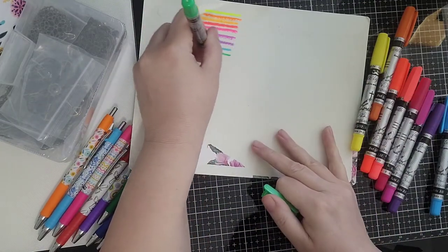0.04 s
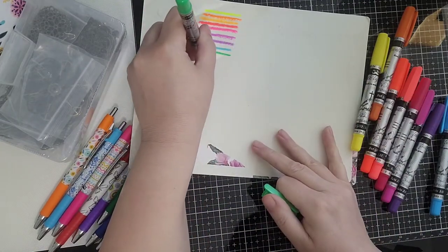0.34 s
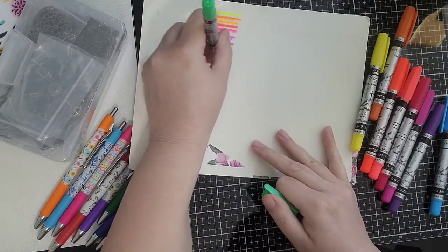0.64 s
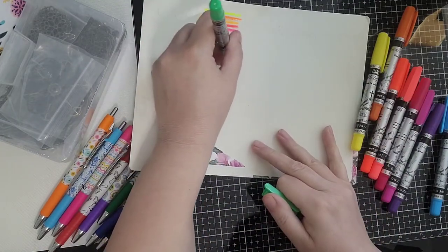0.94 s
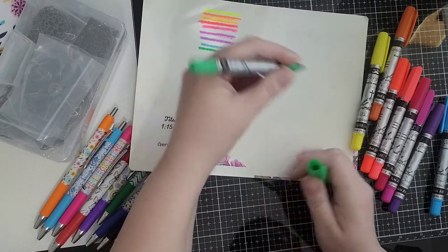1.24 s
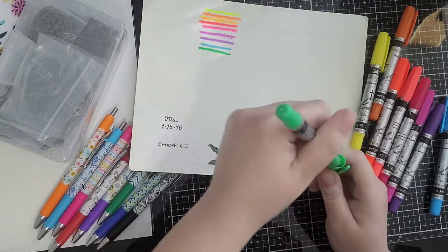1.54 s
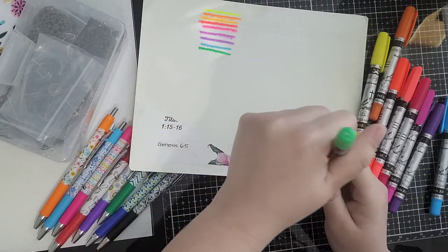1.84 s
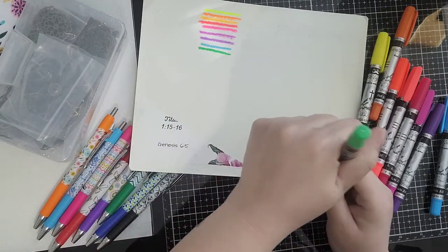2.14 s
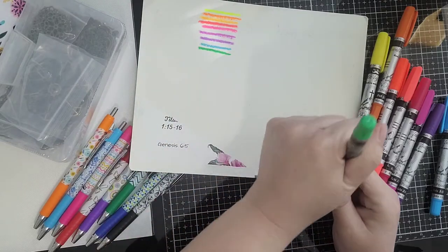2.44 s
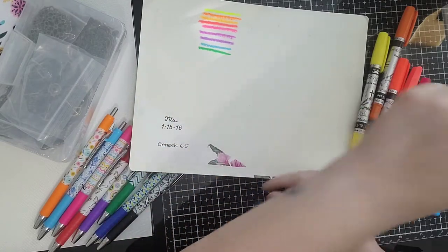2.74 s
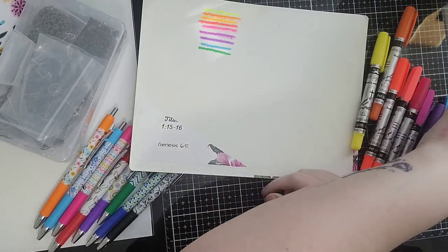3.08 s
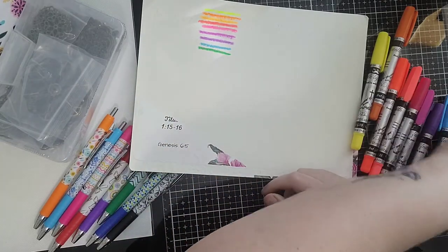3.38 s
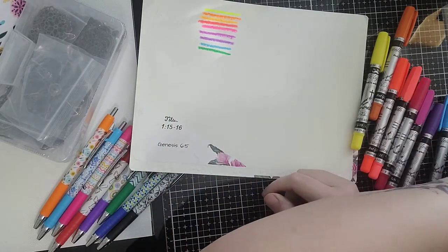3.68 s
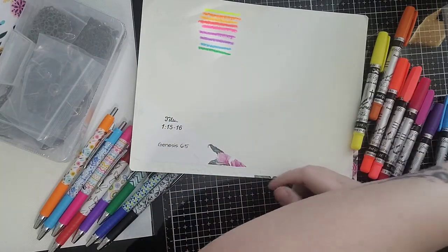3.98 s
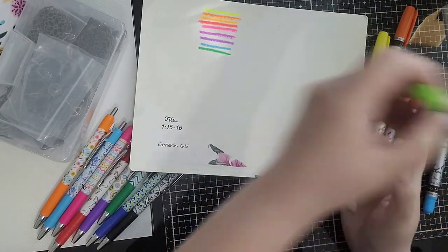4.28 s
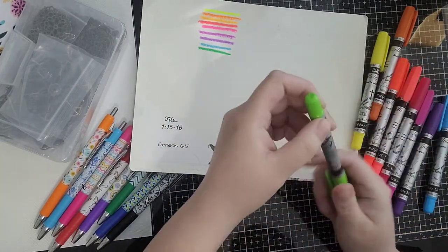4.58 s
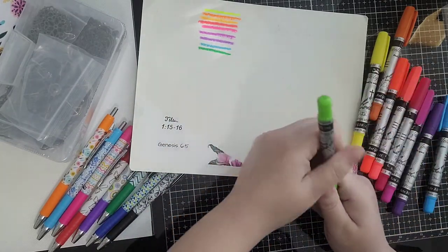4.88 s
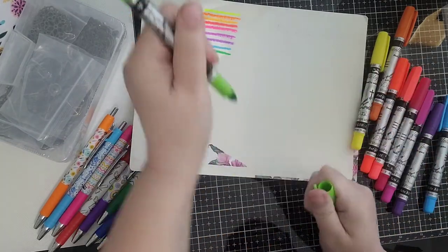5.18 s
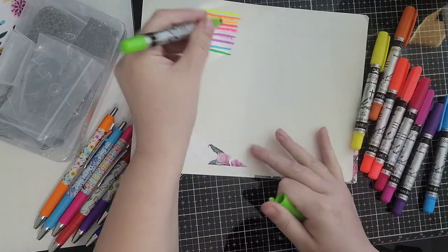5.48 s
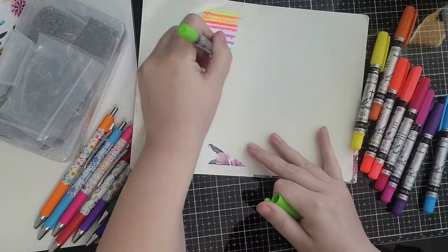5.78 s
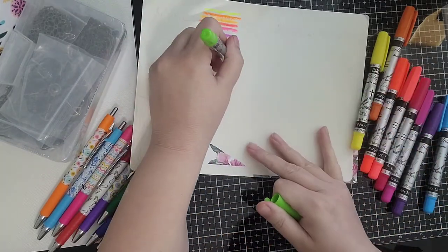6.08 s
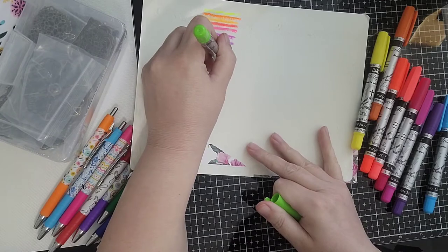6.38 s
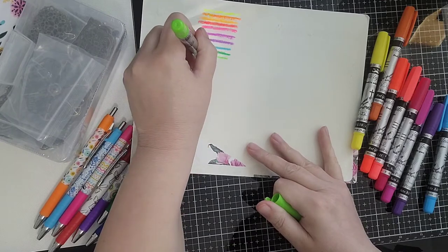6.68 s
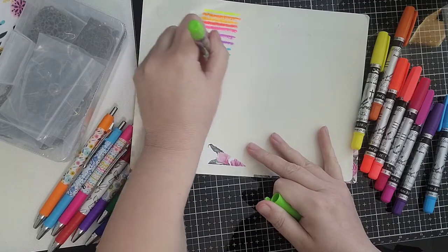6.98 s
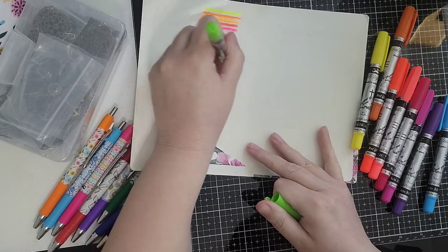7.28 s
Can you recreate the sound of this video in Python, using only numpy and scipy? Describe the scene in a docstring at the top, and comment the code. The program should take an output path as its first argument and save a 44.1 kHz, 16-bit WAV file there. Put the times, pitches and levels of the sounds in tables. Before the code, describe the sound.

A felt marker rubs faintly across paper in short grainy strokes, ending with a small flick of the tip at about 1.1 seconds. Light hollow plastic taps come just before 2 seconds, and the cap snaps shut with a sharp pop at 2.3. After a small knock, the marker lands among others on the desk at about 3.25 with a hard plastic clack, by far the loudest sound. Dull bumps and lighter clicks follow as it settles, thinning out by 4.6 seconds. At 5 seconds another cap pulls free with a pop and a click, followed by a few tiny ticks. Very soft felt strokes return from 5.5 seconds to the end at about 7.5, with small tip touches just after 7. Everything is close to a stereo microphone in a small room, over a faint, steady electrical and fan hum.

```python
"""A desk in a small room, a stereo microphone close to a sketchbook and some felt markers.
A felt tip catches on the paper in grainy strokes. The cap snaps over its catch with a pop of trapped
air, the plastic barrel clacks down among the others and sets the desk top drumming, and the next
marker is pulled open with a pop for more strokes. Mains and a fan hum faintly throughout."""
import sys
import numpy as np
from scipy import signal
from scipy.fft import rfft, irfft
from scipy.io import wavfile

SR = 44100
rng = np.random.default_rng(int(sys.argv[2]) if len(sys.argv) > 2 else 0)


def wrap_up_sound(samples):
    """Save the sound to the file named by the first command line argument, as 16-bit audio."""
    columns = np.atleast_2d(samples).T
    # keep every value between -1 and 1, then stretch to whole-number steps
    tamed = np.clip(columns, -1, 1)
    steps = np.round(tamed * 32767).astype(np.int16)
    wavfile.write(sys.argv[1], SR, steps)


N = 332008
TIME = np.arange(N) / SR
EDGES_HZ = np.geomspace(22, 17500, 30)
BANDS_HZ = np.sqrt(EDGES_HZ[1:] * EDGES_HZ[:-1])
BAND_FILTERS = [signal.butter(2, pair, "band", fs=SR, output="sos") for pair in zip(EDGES_HZ, EDGES_HZ[1:])]
DESK_TOP_HZ = 253

# hum lines: pitch_hz, left_db, right_db
HUM_LINES = [(50.4, -72.5, -66.5), (101.2, -63.5, -67), (121.2, -77, -72.5), (202.3, -84, -87)]
# slow swell of the room tone, taken about its mean: time_s, level_db
ROOM_TONE_SWELL = np.vstack([ [(0.0, -63), (0.74, -64.5), (1.04, -63), (2.54, -62.5), (2.83, -64.5),
                   (3.08, -64.5)], [(3.85, -67), (4.15, -67), (5.28, -62), (5.97, -65), (7.33, -63),
                   (7.53, -62)], ])
# rumble of the room's air: frequency_hz, density_db
AIR_COLOUR = [(25, -10), (55, -0.5), (80, -3), (110, 1.5), (180, 1.5), (280, 2), (380, -10), (600, -18),
              (1100, -23), (3000, -28.5), (8000, -30.5), (16000, -30)]
# felt tip crossing the paper: fastest_s, speed_up_s, slow_down_s, level_db, barrel_resonance_db
TIP_STROKES = [(0.03, .15, 0.18, -73.5, -2), (0.66, 0.24, 0.33, -74.5, 9), (1.091, 0.082, .03, -70.5, 0),
               (5.51, 0.093, 0.11, -73.5, -2), (5.72, 0.14, 0.16, -77, 8), (5.885, 0.079, .06, -78, 5.5),
               (6.40, 0.11, 0.24, -82, 9.5), (6.66, 0.17, 0.21, -85.5, 3), (7.11, 0.21, 0.15, -73.5, -1.5),
               (7.349, 0.077, 0.049, -80, 2), (7.52, .1, .1, -73, -4)]
# felt on paper, skin on plastic: frequency_hz, density_db
RUB_COLOUR = [(200, -23.5), (700, -14.5), (1200, -9.5), (1950, -3.5), (2900, -7.5), (4300, 0.5), (6000, 0),
              (7400, -2), (9000, -7.5), (16000, -11)]
# soft bumps of the hand and a settling marker: start_s, level_db, pitch_hz, decay_s
SOFT_BUMPS = [(0.147, -66, 410, 0.32), (0.848, -75.5, 550, 0.017), (2.505, -71, 390, .03),
              (3.314, -39, 580, 0.035), (3.3307, -35, 910, 0.03), (3.349, -38.5, 664, 0.024),
              (3.603, -53, 610, 0.089), (3.62, -58, 850, .03)]
# light touches of the tip on paper, or on a cap or barrel, ringing the hollow: start_s, level_db, ring_s
LIGHT_TOUCHES = [(0.852, -68, 0.035), (0.972, -61, 0.044), (1.089, -59, 0.05), (1.8147, -53, 0.055),
                 (1.9861, -46, 0.052), (3.7312, -48, 0.071), (3.9001, -67, 0.077), (4.1042, -60.5, 0.032),
                 (4.66, -66, .03), (4.9218, -58.5, 0.035), (5.6623, -64, 0.07), (7.3163, -57.5, 0.038)]
# air in a cap or barrel: pitch_hz, level_db, share_of_ring_time
HOLLOW_MODES = [(780, -16, 0.15), (1410, -2, 0.22), (1832, -3, .7), (2030, -5.5, .7), (2480, -11, .4)]
# the tip flicking off the paper: start_s, level_db
TIP_FLICKS = [(1.047, -72), (1.095, -61), (1.1063, -46.5), (1.234, -72.5), (7.129, -56)]
# one flick: frequency_hz, density_db
FLICK_COLOUR = [(200, -26), (700, -14), (1500, -4), (2400, -3), (3000, -5), (4000, 2), (7200, 0),
                (9000, -12), (16000, -17)]
# the cap's rim jumping its catch: start_s, level_db, tilt_db_per_octave, left_minus_right_db
RIM_SNAPS = [(1.989, -61, 6.5, -4), (2.3095, -24, 0, -0.5), (2.321, -48, -2, -4), (5.037, -44, 1, -1),
             (5.0469, -41.5, 4.5, 1.5), (5.0560, -48, -3, -4)]
# one snap: frequency_hz, density_db
SNAP_COLOUR = [(150, -20), (400, -6.5), (1000, -10.5), (1550, -9.5), (2000, -4.5), (2800, -1), (3800, -2.5),
               (4900, 1), (6200, -0.5), (7600, -3), (9500, -12), (12300, -4.5), (16000, -17.5)]
# plastic knocks and small ticks of the markers and their tips:
# start_s, level_db, relative_thud_db, relative_tick_db
MARKER_KNOCKS = [(2.1119, -51, -12, -8), (3.1215, -55, -7, -22), (3.153, -28, -25, -30),
                 (3.2202, -50, -17, -36), (3.2525, -1, -32.5, -25), (3.5108, -40, -12.5, -24),
                 (3.5334, -38, -13, -29), (3.5842, -46, -11, -12.5), (3.681, -46, -14, -17.5),
                 (3.7314, -41, -20.5, -32), (3.9612, -43.5, -24, -7.5), (4.017, -53.5, -14, -15.5),
                 (4.4602, -60, -19.5, -12), (4.564, -65, -15, -10.5), (5.3757, -61.5, -19.5, 2),
                 (5.395, -53.5, -30, -15.5), (5.524, -61.5, -11.5, -21)]
# a knock's plastic clack: frequency_hz, density_db
CLACK_COLOUR = [(200, -26), (700, -15.5), (1100, -14), (1560, -1), (2000, -4.5), (2470, -2.5), (3110, -2.5),
                (3900, 1.5), (4900, -3.5), (6200, -8), (7800, -15), (9800, -32.5), (16000, -36.5)]
# its dull thud through the desk: frequency_hz, density_db
THUD_COLOUR = [(30, -44.5), (100, -25), (170, -13.5), (260, 3), (450, 1), (720, 1.5), (1200, -5.5),
               (2000, -26.5), (16000, -59)]
# its bright tick: frequency_hz, density_db
TICK_COLOUR = [(1500, -30), (4000, -4.5), (7000, 6), (9000, -2.5), (12000, -1), (16000, -4)]
# ring of a barrel: pitch_hz, level_db
BARREL_MODES = [(1478, -14), (1688, -13), (2040, -13), (2375, -6.5), (2500, -13.5), (2527, -10.5),
                (3022, -15.5), (3712, -4), (4320, -10), (4471, -10), (5177, -16), (5698, -18)]
# fingers and cap sliding on a barrel: fastest_s, speed_up_s, slow_down_s, level_db
BARREL_SLIDES = [(2.301, .065, .015, -65), (2.68, 0.24, .35, -85.5), (4.27, 0.37, 0.53, -86.5),
                 (4.85, .35, 0.32, -86)]
# the cap seating or coming free: start_s, pop_db, pitch_hz, t60_s, thump_db, hollow_db
CAP_POPS = [(2.3088, -24, 510, 0.0052, -60.5, -38.5), (2.312, -35.5, 270.4, 0.046, -44.5, -53.5),
            (5.0366, -22.5, 505, 0.0047, -51, -43), (5.045, -36, 266, 0.044, -39.5, -37.5)]
# likeness of left and right in spread-out sound: frequency_hz, correlation
STEREO_LIKENESS = [(100, .92), (280, .85), (600, 0.29), (1200, -0.26), (2200, -0.062), (4500, -0.19),
                   (16000, 0.72)]
# early echoes off desk, box and wall: delay_s, level_db
EARLY_ECHOES = [(.0035, -14.5), (0.0105, -13.5), (0.0132, -18.5)]
# length of the room's tail: frequency_hz, t60_s
TAIL_DECAY = [(100, .35), (300, .35), (800, .28), (2000, .3), (5000, .32), (8000, .27), (15000, .27)]
# the tail against the direct sound: frequency_hz, level_db
TAIL_COLOUR = [(100, -6.5), (300, -8), (800, -4), (2000, -3), (5000, -5.5), (8000, -5), (15000, -5)]


def from_db(db):
    return 10 ** (np.asarray(db) / 20)


def per_band(points):
    """Read a table at each band's centre, on a log-frequency axis."""
    hz, value = np.transpose(points)
    return np.interp(np.log(BANDS_HZ), np.log(hz), value)


def unit_energy(x):
    return x / np.sqrt(np.sum(x ** 2, axis=-1, keepdims=True) + 1e-30)


def decay(t60, size):
    """Envelope that falls 60 dB in t60 seconds."""
    return np.exp(-np.log(1000) * TIME[:size] / max(t60, 1e-4))


def panned(x, pan_db):
    """Place a sound; pan_db is left minus right."""
    return x * from_db([[pan_db / 2], [-pan_db / 2]])


def add(out, start_s, sound):
    i = max(round(start_s * SR), 0)
    out[:, i:i + sound.shape[-1]] += sound[..., :N - i]


def drift(rate_hz):
    """A random wander through knots of spread 1."""
    knots = rng.standard_normal(int(rate_hz * N / SR) + 2)
    return np.interp(TIME * rate_hz, np.arange(len(knots)), knots)


def coloured(band_db, noise_pairs):
    """Each band filters a pair of noises and makes left and right partly alike; energy 1 a side."""
    gains = from_db(band_db) * np.sqrt(np.diff(EDGES_HZ))
    out = 0
    for sos, gain, pair, alike in zip(BAND_FILTERS, gains, noise_pairs, per_band(STEREO_LIKENESS)):
        left, other = unit_energy(signal.sosfilt(sos, pair))
        right = alike * left + np.sqrt(1 - alike ** 2) * other
        out = out + gain * np.array([left, right])
    return unit_energy(out)


def hiss(colour):
    """Steady stereo noise of rms 1."""
    white = rng.standard_normal((2, 2, N))
    return np.sqrt(N) * coloured(per_band(colour), [white[k % 2] for k in range(len(BANDS_HZ))])


def even_burst(t60, size=4096):
    """A click smeared by a body with many modes: it dies like noise, with all pitches about equal."""
    burst = rng.standard_normal((2, 2, size)) * decay(t60, size)
    for _ in range(4):
        flat_spectrum = np.exp(1j * np.angle(rfft(burst)))
        burst = irfft(flat_spectrum, size) * decay(10 * t60, size)
    return burst


def crack(colour, t60, tilt_db=0):
    """Many heavily damped modes struck at once, with the energy of 10 ms at rms 1."""
    band_db = per_band(colour) + tilt_db * np.log2(BANDS_HZ / 1000)
    bursts = even_burst(t60)
    return np.sqrt(SR / 100) * coloured(band_db, [bursts[k % 2] for k in range(len(BANDS_HZ))])


def ring(hz, t60, phase=0):
    """One damped mode."""
    return np.sin(2 * np.pi * hz * TIME[:SR // 2] + phase) * decay(t60, SR // 2)


def swelling_ring(hz, t60, rise_s):
    """A mode driven gradually instead of struck."""
    return ring(hz, t60) - ring(hz, rise_s)


def struck(modes, spread_db):
    """A blow gives each mode its own strength, and its own phase in each channel."""
    out = 0
    for hz, db, t60 in modes:
        gain = from_db(db + spread_db * rng.standard_normal())
        out = out + gain * ring(hz, t60, phase=rng.uniform(0, 2 * np.pi, (2, 1)))
    return out


def resonance(x, hz, q):
    return signal.lfilter(*signal.iirpeak(hz, q, fs=SR), x)


def hand_sweep(fastest_s, rise_s, fall_s, speed_power=2.1):
    """Rubbing grows as a power of the hand's speed, which rises smoothly and falls back to rest."""
    progress = np.interp(TIME, [fastest_s - rise_s, fastest_s, fastest_s + fall_s], [0, 1, 0])
    return np.sin(np.pi / 2 * progress) ** speed_power


def hum(hz, level_db, waver_db, waver_hz):
    """A tone whose level wavers."""
    gain = from_db(level_db + waver_db * drift(waver_hz))
    return gain * np.sin(2 * np.pi * (hz * TIME + rng.random()))


def room_tone(air_db=-73.5, air_follows=0.42):
    """Hum lines and a fan off to the left over a low rumble of air; all swell and sink together."""
    time_s, db = np.transpose(ROOM_TONE_SWELL)
    swell_db = np.interp(TIME, time_s, db - db.mean())
    lines = sum(hum(hz, np.array([[left_db], [right_db]]), waver_db=2, waver_hz=6.4)
                for hz, left_db, right_db in HUM_LINES)
    fan = panned(hum(hz=252.3, level_db=-62, waver_db=0.87, waver_hz=5), pan_db=7.5)
    air = from_db(air_db + air_follows * swell_db) * hiss(AIR_COLOUR)
    return from_db(swell_db) * (lines + fan) + air


def tip_strokes(trim_db=-1, grain_db=1.5, surge_db=0.6):
    """Felt catches on paper fibres: a grainy hiss that follows the hand; the barrel sings along."""
    rub = from_db(trim_db + grain_db * drift(430) + surge_db * drift(23)) * hiss(RUB_COLOUR)
    barrel = resonance(rub, hz=1950, q=6)
    return sum(from_db(db) * hand_sweep(fastest_s, rise_s, fall_s) * (rub + from_db(barrel_db) * barrel)
               for fastest_s, rise_s, fall_s, db, barrel_db in TIP_STROKES)


def soft_bumps(slope_db_per_octave=-20, rest_s=3.357, drum_db=-31):
    """Soft contacts sound around one low pitch; the marker settles and sets the desk top drumming."""
    out = np.zeros((2, N))
    for start_s, level_db, hz, decay_s in SOFT_BUMPS:
        colour = np.column_stack([BANDS_HZ, slope_db_per_octave * np.abs(np.log2(BANDS_HZ / hz))])
        add(out, start_s, from_db(level_db) * crack(colour, decay_s))
    add(out, rest_s, from_db(drum_db) * swelling_ring(DESK_TOP_HZ, t60=.12, rise_s=0.045))
    return out


def hollow(ring_s, detune=0.02):
    """The air in a cap or barrel gives a short, chirpy note whose pitch depends on the grip."""
    grip = 1 + detune * rng.standard_normal()
    return struck([(grip * hz, db, share * ring_s) for hz, db, share in HOLLOW_MODES], spread_db=2)


def light_touches(trim_db=-2):
    """Light touches of the tip on paper, or on a cap or barrel, ring the hollow."""
    out = np.zeros((2, N))
    for start_s, level_db, ring_s in LIGHT_TOUCHES:
        add(out, start_s, from_db(level_db + trim_db) * hollow(ring_s))
    return out


def tip_flicks(hollow_db=-8):
    """The tip flicks off the end of a stroke and rings the hollow barrel."""
    out = np.zeros((2, N))
    for start_s, level_db in TIP_FLICKS:
        add(out, start_s, from_db(level_db) * crack(FLICK_COLOUR, t60=0.026))
        add(out, start_s, from_db(level_db + hollow_db) * hollow(ring_s=0.028))
    return out


def rim_snaps(tail_db=-12):
    """The cap's rim jumps its catch: a sharp crack with a quieter tail."""
    out = np.zeros((2, N))
    for start_s, level_db, tilt_db, pan_db in RIM_SNAPS:
        snap = crack(SNAP_COLOUR, .006, tilt_db) + from_db(tail_db) * crack(SNAP_COLOUR, 0.039, tilt_db)
        add(out, start_s, from_db(level_db) * panned(snap, pan_db))
    return out


def marker_knocks(clack_db=-13, clack_t60=.017, chatter_s=.0018, chatter_db=-4, firmness=.15):
    """Markers and their tips knock and tick just right of centre; barrel and desk top ring faintly."""
    out = np.zeros((2, N))
    for start_s, level_db, thud_db, tick_db in MARKER_KNOCKS:
        blow = from_db(level_db)
        clack = from_db(clack_db) * crack(CLACK_COLOUR, clack_t60)
        thud = from_db(thud_db) * crack(THUD_COLOUR, t60=0.037)
        tick = from_db(tick_db - 2) * crack(TICK_COLOUR, clack_t60)
        add(out, start_s, blow * panned(clack + thud + tick, pan_db=-1))
        # only a hard blow sets the barrel ringing freely
        freedom = from_db(-24 + firmness * level_db)
        barrel = freedom * struck([(hz, db, .22) for hz, db in BARREL_MODES], spread_db=1.9)
        desk_top = from_db(thud_db - 10) * ring(DESK_TOP_HZ, t60=.22)
        add(out, start_s, blow * (barrel + desk_top))
        # a second, softer clack a moment later, as when a barrel's other end lands
        chatter = from_db(clack_db + chatter_db) * crack(CLACK_COLOUR, clack_t60)
        add(out, start_s + chatter_s, blow * chatter)
    return out


def barrel_slides(trim_db=-2, grain_db=2.5, surge_db=2.0, sheen_db=-2):
    """Skin and cap slide unevenly over smooth plastic: a faint hiss with a high sheen."""
    rub = from_db(trim_db + grain_db * drift(400) + surge_db * drift(23)) * hiss(RUB_COLOUR)
    strength = sum(from_db(db) * hand_sweep(fastest_s, rise_s, fall_s)
                   for fastest_s, rise_s, fall_s, db in BARREL_SLIDES)
    return strength * (rub + from_db(sheen_db) * resonance(rub, hz=7500, q=8))


def cap_pops():
    """As the cap seats or comes free, trapped air pops, the hand recoils and the hollow rings."""
    out = np.zeros((2, N))
    for start_s, pop_db, hz, t60, thump_db, hollow_db in CAP_POPS:
        add(out, start_s, -from_db(pop_db) * ring(hz, t60))
        add(out, start_s, from_db(thump_db) * swelling_ring(hz=59.64, t60=0.21, rise_s=0.11))
        add(out, start_s, from_db(hollow_db) * hollow(ring_s=0.078))
    return out


def small_room(x):
    """A few early echoes, then a diffuse tail that dies sooner in the treble."""
    size = SR // 2
    band_db = per_band(TAIL_COLOUR)
    tail_gain = np.sqrt(np.average(from_db(band_db) ** 2, weights=np.diff(EDGES_HZ)))
    scattered = rng.standard_normal((2, 2, size)) * (1 - decay(0.015, size))
    tails = [scattered[k % 2] * decay(t60, size) for k, t60 in enumerate(per_band(TAIL_DECAY))]
    response = tail_gain * coloured(band_db, tails)
    for delay_s, level_db in EARLY_ECHOES:
        arrivals = (delay_s * SR * rng.uniform(.95, 1.05, 2)).astype(int)
        response[[0, 1], arrivals] += from_db(level_db)
    return signal.fftconvolve(x, response, axes=1)[:, :N]


def scene():
    """The desk up close, with the room's reflections and its hum behind."""
    desk = marker_knocks() + soft_bumps()
    desk += light_touches() + rim_snaps() + cap_pops()
    desk += tip_strokes() + tip_flicks() + barrel_slides()
    return desk + small_room(desk) + room_tone()


def record(dry, low_cut_hz=36, presence_hz=7400, presence_db=-6, ceiling=.85, top_cut_hz=15900):
    """The small microphone loses deep bass, lifts presence and rounds the loudest hit; steep top cut."""
    thin = signal.sosfilt(signal.butter(2, low_cut_hz, "high", fs=SR, output="sos"), dry)
    bright = thin + from_db(presence_db) * resonance(thin, presence_hz, q=10)
    rounded = ceiling * np.tanh(bright / ceiling)
    return signal.sosfilt(signal.ellip(10, .1, 80, top_cut_hz, fs=SR, output="sos"), rounded)


dry = scene()
out = record(dry)
wrap_up_sound(out)
```